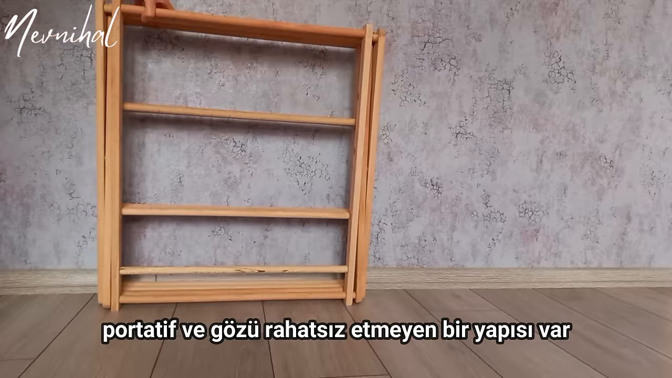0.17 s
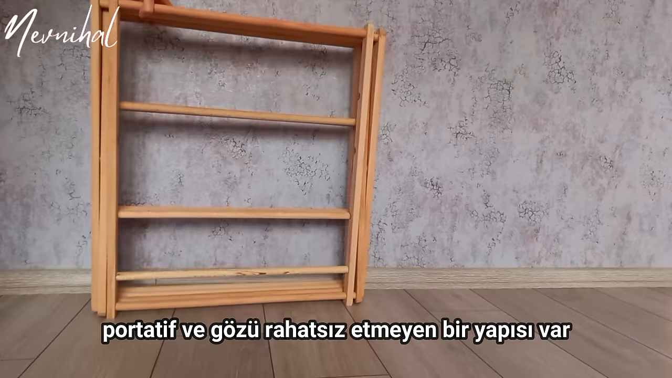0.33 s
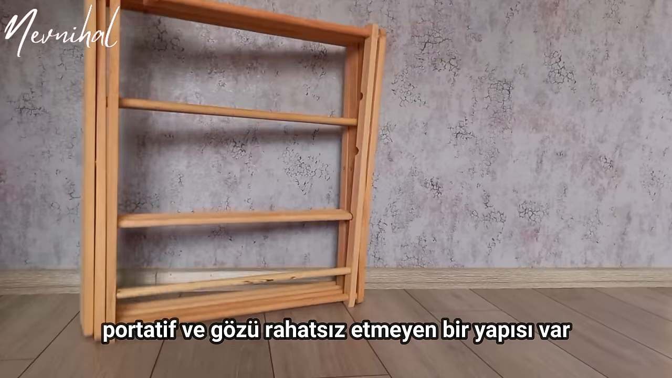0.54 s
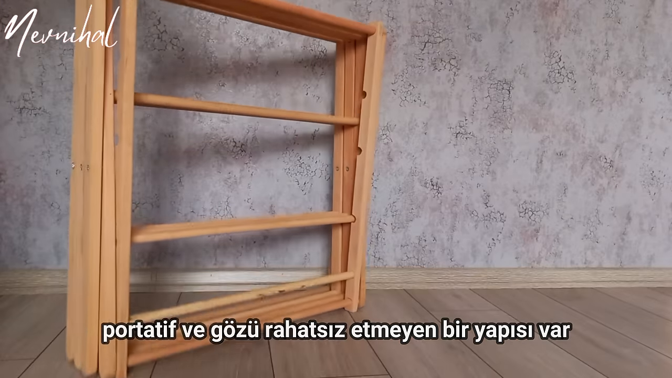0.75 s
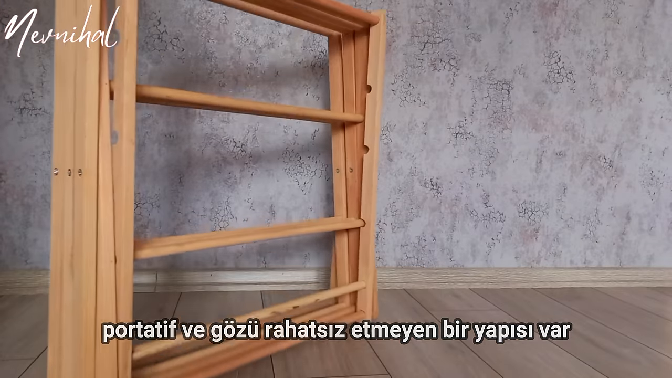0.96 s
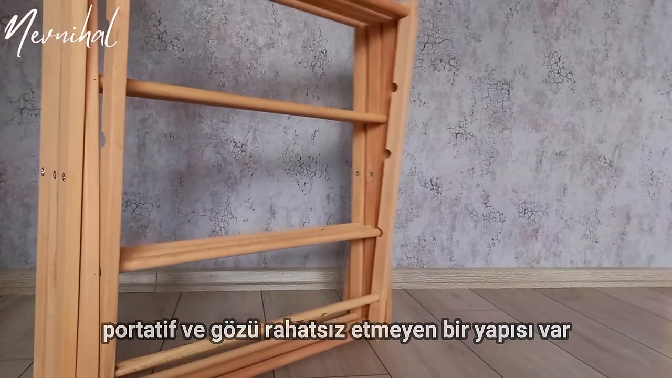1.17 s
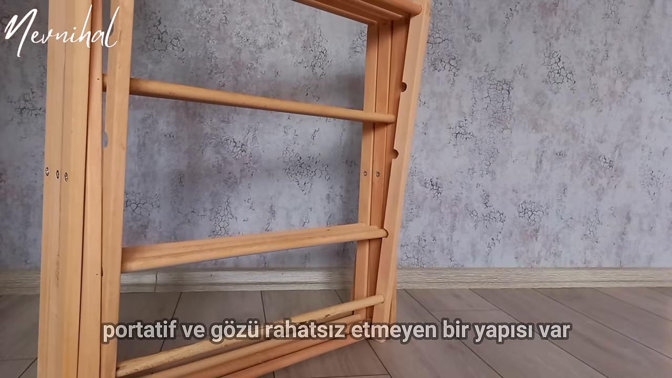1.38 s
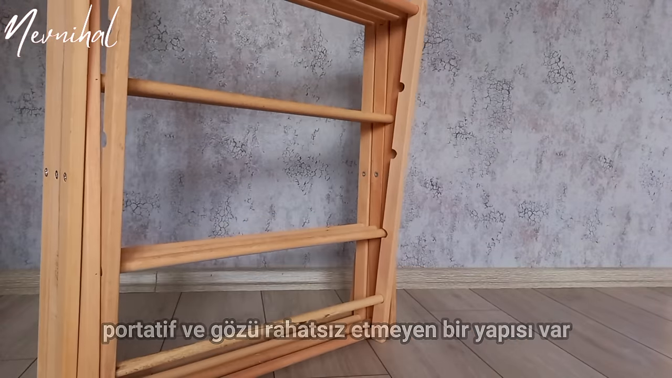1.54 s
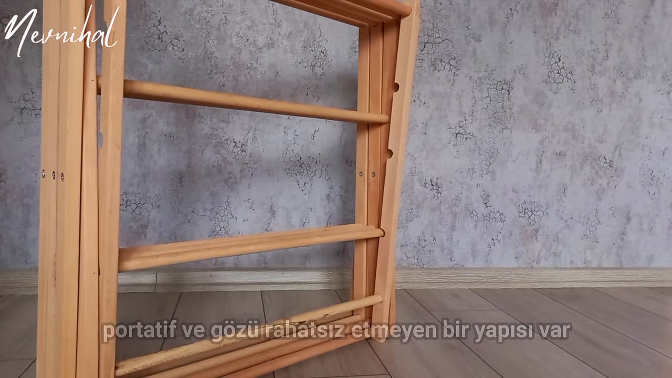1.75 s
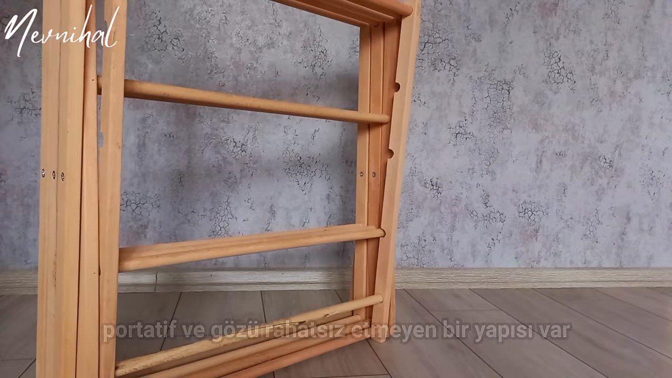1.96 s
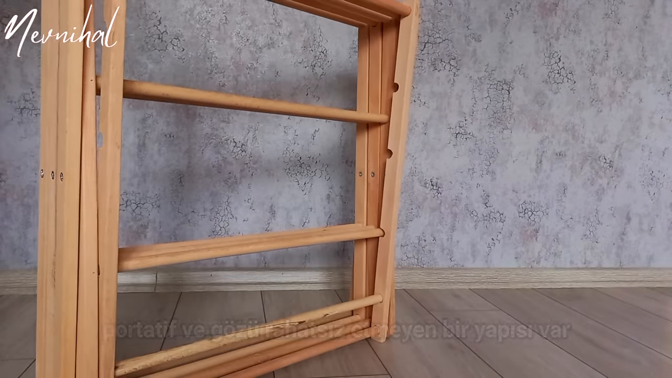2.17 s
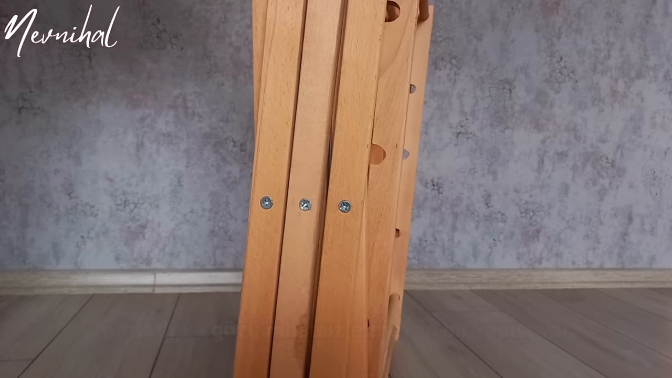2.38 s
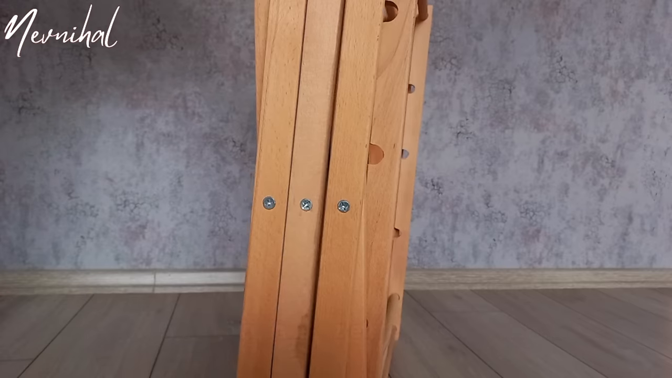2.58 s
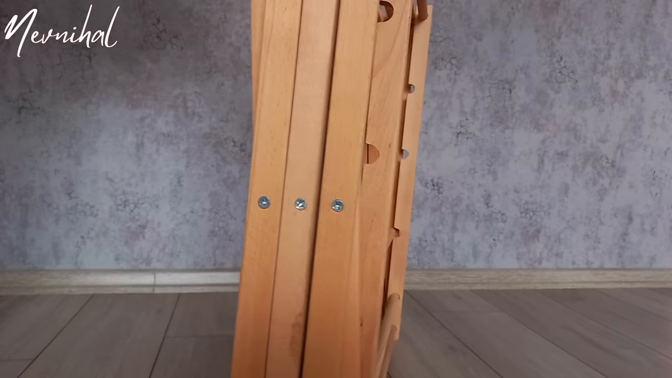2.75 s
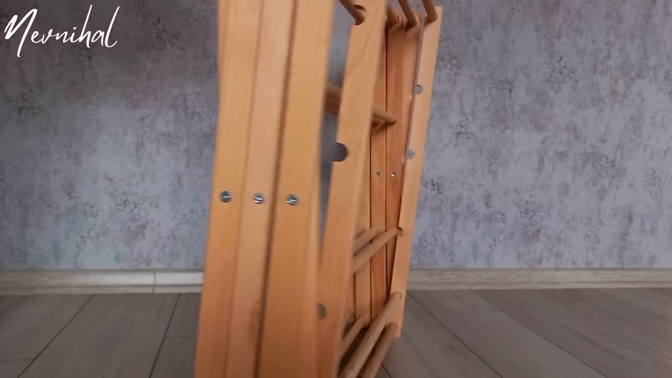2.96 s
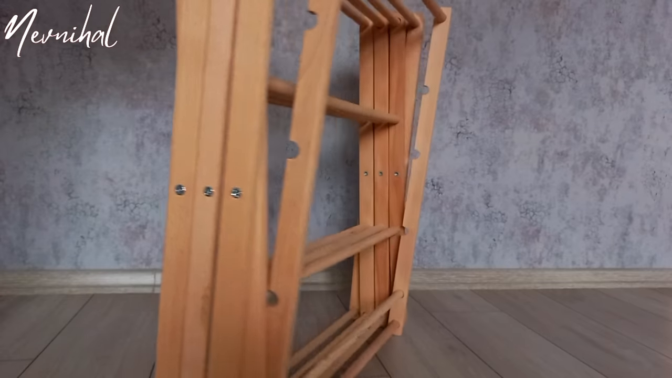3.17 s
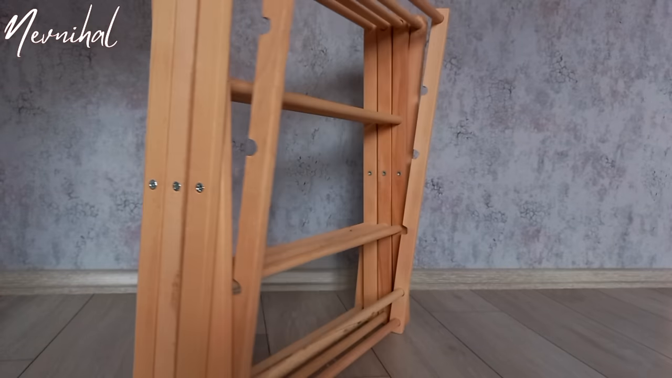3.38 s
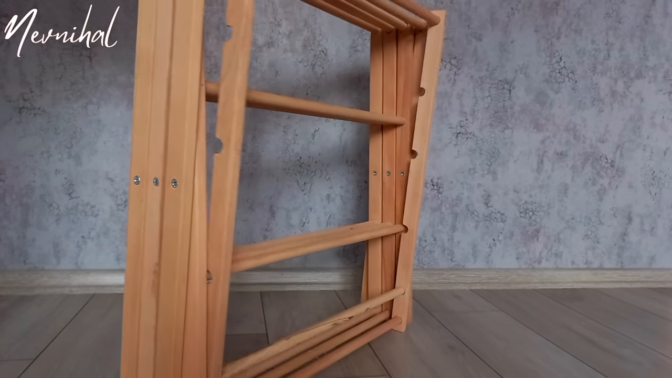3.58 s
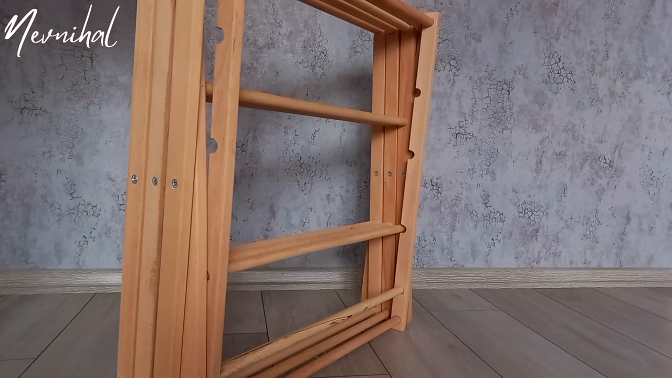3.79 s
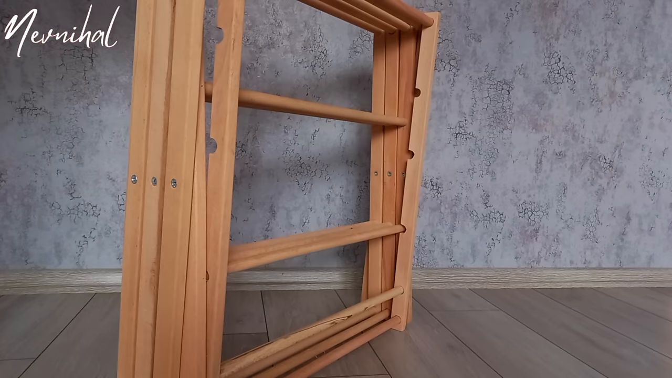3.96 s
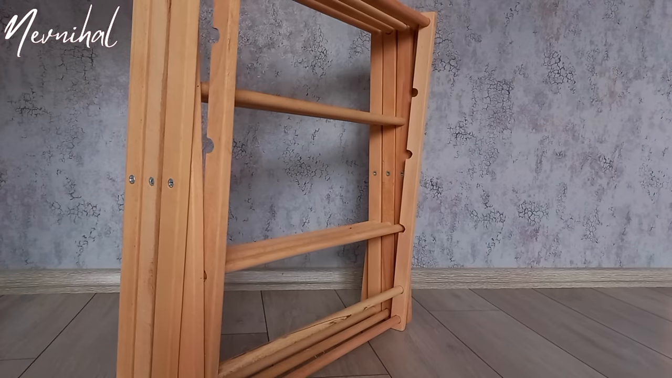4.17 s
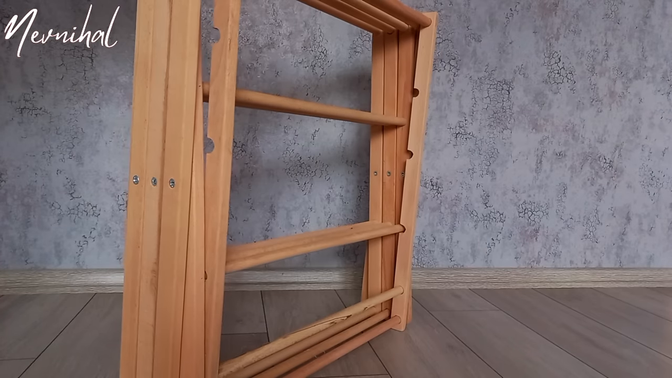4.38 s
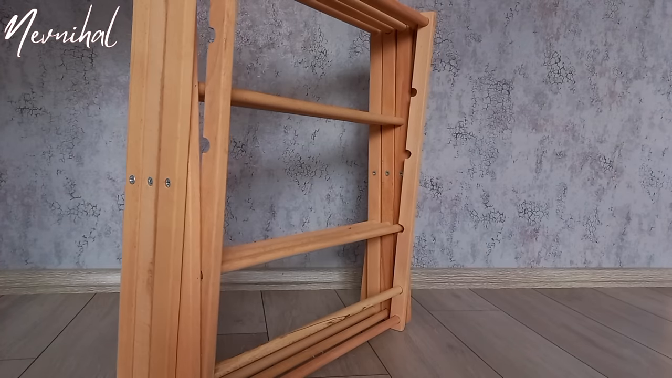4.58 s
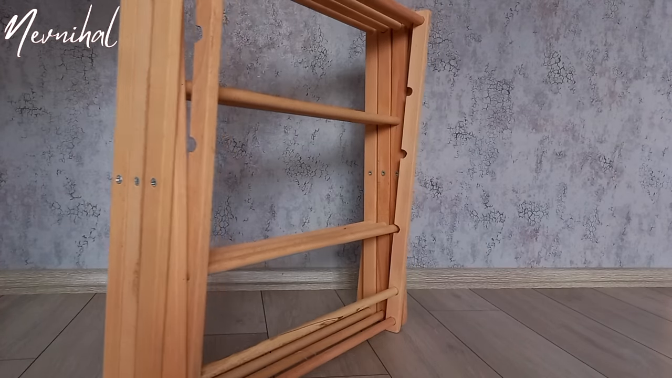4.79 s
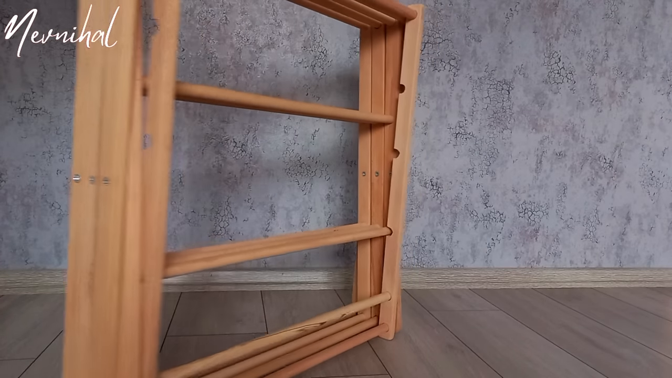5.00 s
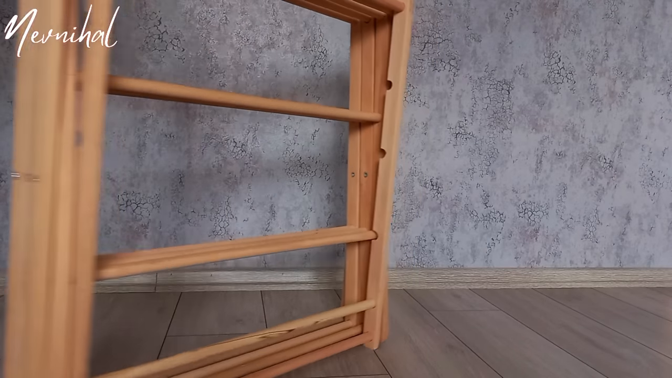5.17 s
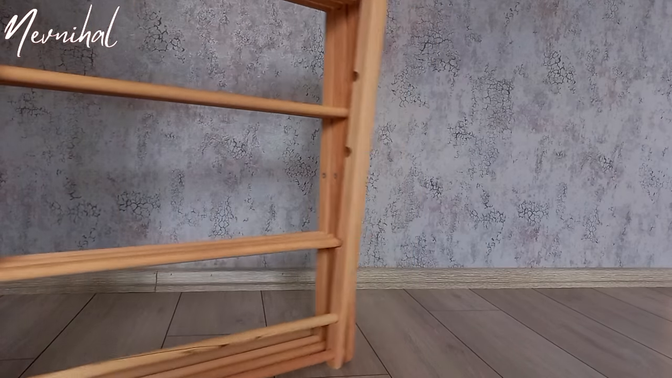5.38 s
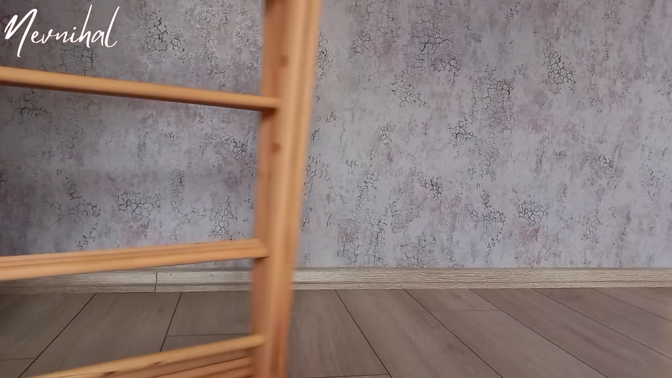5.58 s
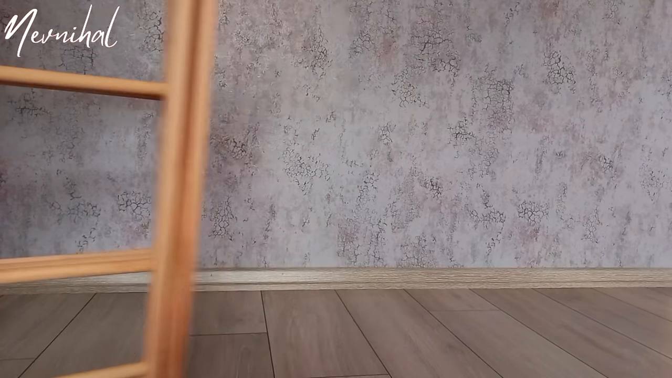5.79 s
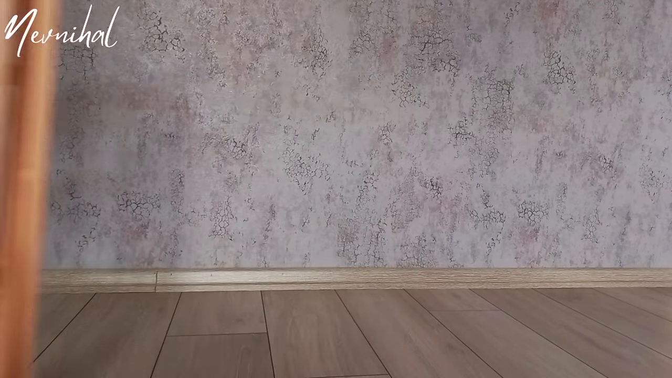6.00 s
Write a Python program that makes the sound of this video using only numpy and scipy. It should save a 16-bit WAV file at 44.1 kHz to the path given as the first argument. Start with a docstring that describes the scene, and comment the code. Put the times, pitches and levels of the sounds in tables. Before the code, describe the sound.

In a bare, quiet room a folded wooden drying rack is handled close to stereo microphones. Clacks and a gritty scrape come first, then a tight cluster of knocks. After a quiet gap with faint hand swishes, a second shorter scrape ends in a very sharp crack. Small knocks follow, then squeaky chirps and the loudest drag, with heavy thumps, continuing to the end.

```python
"""A bare room with a laminate floor: a folded wooden drying rack is turned and dragged before two microphones.
Its feet scrape in three strokes; tiny slips boom in the boards, ring the frame and hiss in the grit.
The last stroke comes close and is the loudest; lightly loaded feet chirp in narrow resonances.
Feet set down and loose frames clack as filtered pushes and cracks with frame modes, room echo and floor thump.
Hands swish over the slats as swelling noise, above the low rumble and faint hiss of the quiet room."""
import sys
import numpy as np
from scipy import signal
from scipy.fft import rfft, irfft, next_fast_len
from scipy.io import wavfile

SR = 44100
rng = np.random.default_rng(int(sys.argv[2]) if len(sys.argv) > 2 else 0)


def log_audio(samples):
    """Write samples as a 16-bit WAV file to the path given in sys.argv[1]."""
    # one column per channel
    frames = np.atleast_2d(samples).T
    # limit to full scale, then quantise
    limited = np.clip(frames, -1, 1)
    pcm = np.round(limited * 32767).astype(np.int16)
    wavfile.write(sys.argv[1], SR, pcm)


N = 266187  # length in samples

# push behind each stroke: time_s, speed_db (grit hiss), load_db (wood rasp, before a fixed lift)
STROKE_PUSH_1 = [(0.27, -59.5, -56), (0.358, -46, -43), (0.514, -39.5, -32), (0.552, -38, -34),
                 (0.954, -36, -30), (1.132, -42.5, -36), (1.14, -36.5, -32.5)]
STROKE_PUSH_2 = [(2.84, -65.5, -60), (2.89, -56, -53.5), (2.962, -47.5, -40), (3.09, -40.5, -29),
                 (3.166, -41.5, -30.5), (3.63, -43.5, -35), (3.72, -49.5, -48.5)]
STROKE_PUSH_3 = [(4.79, -60, -71.5), (4.896, -42.5, -48), (5.396, -35, -30.5), (5.414, -32, -28),
                 (6.03, -29.5, -24)]
# how hollow the floor is under each stroke: boom_db (over the load, at the usual load)
FLOOR_HOLLOWNESS_DB = [4.5, -2, 3]
# shape of the wood rasp in each stroke: frequency_hz, relative_db_per_hz
WOOD_RASP_1 = [(110, -35.5), (190, -20), (259, -12), (296, -1.5), (381, -11.5), (536, -2), (730, -8.5),
               (809, -3.5), (917, -11), (1020, -7.5), (1410, -14), (2390, -19), (2900, -21), (3770, -40),
               (6380, -120)]
WOOD_RASP_2 = [(110, -17.5), (185, -3), (274, -4), (317, -10.5), (574, -7.5), (809, -10), (917, -13.5),
               (1020, -11.5), (1140, -17), (1950, -25), (2110, -16.5), (2360, -32), (2900, -42.5),
               (3770, -47.5), (6380, -120)]
WOOD_RASP_3 = [(110, -44.5), (190, -13), (220, -6), (259, -2), (296, -3.5), (422, -12.5), (549, -2),
               (622, -6.5), (799, -5), (906, -11), (1100, -10.5), (1410, -14), (2900, -15.5), (3770, -50),
               (6380, -120)]
# shape of the grit hiss in each stroke: frequency_hz, relative_db_per_hz
GRIT_HISS_1 = [(1290, -41), (2200, -21), (2470, -27), (2680, 1.5), (4600, 4.5), (5030, 0.5), (5980, -4.5),
               (7400, -10), (8580, -7), (9620, -16), (11900, -17.5), (15600, -22)]
GRIT_HISS_2 = [(1290, -40.5), (2200, -13), (2370, -8.5), (2630, -3.5), (2840, -1.5), (3100, -3.5),
               (4340, -4), (7220, -14.5), (8440, -11.5), (9620, -20.5), (13900, -27), (15600, -37)]
GRIT_HISS_3 = [(1290, -12.5), (2200, -19), (2450, -6), (2770, -0.5), (3370, -0.5), (4710, 0.5), (5830, -8),
               (8580, -9), (10500, -19), (12800, -17), (15600, -23.5)]
# shape of the floor boards' boom: frequency_hz, relative_db_per_hz
BOARD_BOOM = [(40, -27), (48, -12), (59, -10.5), (70, 0), (81, 13), (94, 2.5), (112, 10.5), (134, -8.5),
              (155, 1.5), (185, -7), (220, -9)]
# modes of the wooden frame: pitch_hz, relative_db
FRAME_MODES = [(217, -3.5), (293, -10), (360, -1.5), (559, -2.5), (788, 3), (1005, 0), (1320, 1.5),
               (1416, -5.5), (1510, -5), (1835, -6.5), (1895, -4.5), (2003, -8), (2080, 1), (2325, -9.5),
               (2603, 2), (2800, -3.5), (2939, 0.5), (3208, -4), (3712, 6.5), (4027, -0.5), (4330, -16.5),
               (5545, -8)]
# undamped decay of the frame, higher modes die sooner: frequency_hz, t60_s
FRAME_DECAY = [(200, .42), (700, .3), (2000, .28), (5500, .2)]
# a lightly loaded foot chirps as it starts to slide: start_s, length_s, pitch_hz, width_hz, level_db
FOOT_CHIRPS = [(4.835, 0.235, 2886, 70.4, -45), (4.892, .14, 2250, 25, -51.5),
               (4.992, 0.14, 1930, 25, -46.5), (5.147, 0.27, 2855, 71, -40.5)]
# wood on wood and feet on the floor: start_s, peak_db, hardness_hz, thump_db, direct_db (push and crack)
BLOWS = [(0.003, -55, 300, -36, -1), (0.0745, -37, 1170, -31, 10), (0.081, -19.5, 2770, -55, -47),
         (0.101, -17.5, 1100, -27, -3), (0.185, -23, 666, -33.5, 2), (0.45, -24, 400, -17.5, 1),
         (0.859, -21, 14000, -19.5, 5), (1.156, -13.5, 1000, -14, 18), (1.175, -9, 1100, -19.5, 9.5),
         (1.187, -12, 550, -16.5, 6.5), (1.212, -9.5, 4530, -21.5, 8.5), (1.696, -40, 750, -30.5, -8),
         (1.82, -48.5, 400, -53.5, -10), (2.247, -44.5, 750, -33, -5), (2.293, -41.5, 400, -45, -10),
         (2.363, -49, 3800, -63, -0.5), (2.45, -73.5, 300, -39, 5), (2.642, -37.5, 900, -34.5, -16),
         (2.657, -31.5, 1650, -54, -10), (2.681, -21, 1550, -37, 8), (2.708, -35.5, 11300, -60, -6),
         (3.02, -18.5, 220, -29.5, -1), (3.092, -16, 220, -25, -8.5), (3.296, -19.5, 1250, -36.5, 1),
         (3.746, -11.5, 3000, -29.5, 4), (3.751, -2.5, 5570, -23, 5), (3.776, -6, 3370, -12.5, -12),
         (3.97, -28.5, 890, -34, -7), (4.126, -41.5, 601, -30.5, 0), (4.146, -27, 1700, -34, -14.5),
         (4.21, -28.5, 550, -48.5, -32.5), (4.294, -28.5, 1090, -34.5, 1), (4.41, -28.5, 2050, -35.5, 0.5),
         (5.44, -11.5, 1300, -14, -10), (5.52, -21, 300, -9.5, -4), (5.712, -5, 500, -9.5, 5.5)]
# shapes of the blows and of their floor thumps: frequency_hz, relative_db_per_hz
CLACK_SPECTRUM = [(100, -18), (300, 0.5), (800, -4.5), (1500, -3.5), (2700, -0.5), (3400, -5.5), (5000, -7),
                  (6500, -11.5), (8500, -8.5), (10500, -13.5), (16000, -19.5)]
THUMP_SPECTRUM = [(35, -29), (60, -9.5), (80, 3.5), (130, 2), (220, -3), (350, -17.5), (700, -35.5),
                  (2000, -61)]
# decay of the room echo: frequency_hz, t60_s
ROOM_DECAY = [(60, 0.67), (150, 0.33), (400, 0.39), (1000, 0.38), (2500, 0.34), (5000, .32), (9000, 0.29),
              (16000, .24)]
# hand and sleeve slide over the slats to a new grip: middle_s, level_db, spread_s, pitch_hz
GRIP_RUBS = [(1.72, -57, 0.067, 3020), (1.98, -65, 0.12, 8200), (2.19, -70, .025, 8750),
             (2.547, -58.5, 0.026, 3330), (2.62, -67, 0.039, 8000), (4.17, -65, 0.042, 7200),
             (4.406, -57.5, 0.026, 4400), (4.72, -57, 0.064, 3180)]
# shape of their airy hiss: frequency_hz, relative_db_per_hz
RUB_SPECTRUM = [(2000, -11), (2800, -6), (4600, 2.5), (7000, -1.5), (8600, 0), (10000, -7), (15000, -17)]
# shape of the quiet room: frequency_hz, relative_db_per_hz
QUIET_ROOM = [(25, -26), (48, -8.5), (75, -4), (125, -7), (200, -15), (500, -19.5), (1500, -23.5),
              (3000, -25), (6000, -31), (8500, -24.5), (10000, -31), (16000, -30.5)]
# how alike the two microphones hear: frequency_hz, likeness (1 same, 0 unrelated)
MICROPHONE_LIKENESS = [(60, .997), (170, .975), (350, .9), (700, .65), (1400, -.1), (2800, .03), (16000, 0)]
# the scraping feet lie to the left: frequency_hz, left_over_right_db
LEFT_LEAN = [(100, 0), (700, 0.8), (1400, -1), (2800, 1), (5500, 3), (10000, 4), (16000, 1)]

LEFT_LEAD_S = .00016
CHIRP_ATTACK_S, CHIRP_RELEASE_S = 0.032, 0.026
CUTOFF_HZ = 15900


def dragging(judder_db=0.73, boom_judder_db=2.0, grit_judder_db=0.03, rasp_db=2.34,
             boom_follows=1.05, usual_load_db=-30):
    """Slips excite boards, frame and grit: speed sets the hiss, load the rasp and boom; the grip wavers."""
    grip = drift(16)
    boards = colour(slips(2900, spread_db=0.0), BOARD_BOOM)
    boards = rms_one(boards * from_db(boom_judder_db * grip))

    wood = dense_modes(slips(5000, spread_db=3.0), share=0.69, decay_s=.012)
    wood = through_frame(wood, ring=0.54, damping=1.0) * from_db(judder_db * grip)

    dust = dense_modes(slips(11000, spread_db=3.0), share=.55, decay_s=.008)
    dust = through_frame(dust, ring=0.21, damping=1.0)
    dust = dust * from_db(grit_judder_db * (drift(30) + .5 * grip))

    strokes = [(STROKE_PUSH_1, WOOD_RASP_1, GRIT_HISS_1),
               (STROKE_PUSH_2, WOOD_RASP_2, GRIT_HISS_2),
               (STROKE_PUSH_3, WOOD_RASP_3, GRIT_HISS_3)]
    out = 0
    for (push, rasp_colour, grit_colour), hollow_db in zip(strokes, FLOOR_HOLLOWNESS_DB):
        speed, load = gains(push)
        boom = from_db(usual_load_db + hollow_db) * (load / from_db(usual_load_db)) ** boom_follows
        rasp = from_db(rasp_db) * load * colour(wood, rasp_colour)
        hiss = speed * colour(dust, grit_colour)
        out = out + boom * boards + rasp + hiss
    return lean_left(out)


def slips(per_s, spread_db):
    """Tiny random catches of wood on the floor, either way; spread_db makes their sizes uneven."""
    excess_db = spread_db * np.minimum(rng.exponential(1, (2, N)), 5)
    sizes = from_db(excess_db) * rng.choice([-1, 1], (2, N))
    return sizes * (rng.random((2, N)) < per_s / SR)


def dense_modes(x, share, decay_s):
    """Countless weak modes ripple the spectrum; the ripple shifts as the feet travel."""
    t = np.arange(SR // 10) / SR
    responses = rng.standard_normal((3, 2, len(t))) * np.exp(-t / decay_s)
    responses /= np.linalg.norm(responses, axis=2, keepdims=True)
    # drifting weights blend the three responses
    places = np.array([drift(2.7) for _ in responses])
    places /= np.linalg.norm(places, axis=0)
    ripple = sum(place * signal.oaconvolve(x, response, axes=1)[:, :N]
                 for place, response in zip(places, responses))
    return x + share * ripple


def through_frame(x, ring, damping):
    """The frame adds its modes to what shakes it; damping by hand and floor widens them."""
    modes = 0
    for hz, db in FRAME_MODES:
        width_hz = damping * np.log(1000) / (np.pi * at_hz(FRAME_DECAY, hz))
        modes = modes + from_db(db) * resonate(x, hz, width_hz)
    return x + ring * modes


def chirping(waver_db=0.5, waver_hz=18):
    """Friction sings in narrow resonances of the foot; each chirp swells, wavers and dies."""
    t, out = np.arange(N) / SR, 0
    for start, length, hz, width, db in FOOT_CHIRPS:
        once = resonate(rng.standard_normal((2, N)), hz, width)
        song = rms_one(resonate(once, hz, width))
        swell = np.clip((t - start) / CHIRP_ATTACK_S, 0, 1)
        release = np.exp(-np.maximum(t - start - length, 0) / CHIRP_RELEASE_S)
        out = out + from_db(db + waver_db * drift(waver_hz)) * swell * release * song
    return out


def knocks(crack_s=0.006, push_hz=4500, room_db=-3.0, modes_db=-16.0, thin=0.11,
           thump_s=0.014, thump_room_db=6.0):
    """Each blow is a push, a short crack, the ring of the frame and the room; the floor thumps below."""
    t, out = np.arange(SR) / SR, np.zeros((2, N + SR))
    ringing = np.array([from_db(db - 60 * t / at_hz(FRAME_DECAY, hz)) * np.exp(2j * np.pi * hz * t)
                        for hz, db in FRAME_MODES])
    # three pairs of echoes serve the blows in turn
    echoes = [(room_tail(CLACK_SPECTRUM), room_tail(THUMP_SPECTRUM)) for _ in range(3)]
    cracks = colour(rng.standard_normal((2, N + SR)), CLACK_SPECTRUM)
    thuds = colour(rng.standard_normal((2, N + SR)), THUMP_SPECTRUM)
    for k, (s, peak_db, hardness_hz, thump_db, direct_db) in enumerate(BLOWS):
        echo, low_echo = echoes[k % len(echoes)]
        first = k * (N // len(BLOWS))
        own = slice(first, first + SR)  # each blow starts elsewhere in the noise

        # every contact point excites the modes in its own way
        size = (2, len(FRAME_MODES))
        strengths = from_db(rng.normal(0, 2, size)) * np.exp(2j * np.pi * rng.random(size))
        modes = (strengths @ ringing).real

        direct = cracks[:, own] * np.exp(-t / crack_s) * (1 - np.exp(-t / 0.0006))
        # a soft contact pushes harder here; the low-pass below stretches the push
        direct[:, 0] += (push_hz / max(hardness_hz, 1000)) ** 2
        clack = from_db(direct_db) * direct + from_db(room_db) * echo + from_db(modes_db) * modes

        # soft contacts are dull; hard ones are bright and thin
        dull = signal.butter(3, hardness_hz, fs=SR, output="sos")
        thinning = signal.butter(1, thin * hardness_hz, "high", fs=SR, output="sos")
        clack = signal.sosfilt(thinning, signal.sosfilt(dull, clack))

        thump = thuds[:, own] * np.exp(-t / thump_s) + from_db(thump_room_db) * low_echo
        thump = thump * (1 - np.exp(-t / 0.011))
        at = round(s * SR)
        out[:, at:at + SR] += from_db(peak_db) * peak_one(clack, crest=4.69)
        out[:, at:at + SR] += from_db(thump_db) * peak_one(thump, crest=4.46)
    return out[:, :N]


def room_tail(spectrum, ring=0.48):
    """One second of diffuse echo, coloured by the frame; each band dies at its own rate."""
    t, hz = np.arange(SR) / SR, np.arange(SR // 2 + 1)
    # the first second lets the modes build up
    shaken = through_frame(rng.standard_normal((2, 2 * SR)), ring, damping=2.3)[:, SR:]
    noise, out = rfft(colour(shaken, spectrum)), 0
    for k, (_, t60) in enumerate(ROOM_DECAY):
        # bands overlap, and their shares add up to one
        share = at_hz([(f, j == k) for j, (f, _) in enumerate(ROOM_DECAY)], hz)
        out = out + irfft(noise * share, SR) * from_db(-60 * t / t60)
    return out


def peak_one(blow, crest):
    """Scale a blow to a peak near 1, going by the power of its first 50 ms."""
    return blow / (crest * np.sqrt(np.mean(blow[:, :SR // 20] ** 2)))


def rubbing(width_hz=1300):
    """Short dry swishes over smooth wood: resonant friction and airy hiss, swelling and fading."""
    t, friction = np.arange(N) / SR, rng.standard_normal((2, N))
    airy = colour(rng.standard_normal((2, N)), RUB_SPECTRUM)
    out = 0
    for middle, db, spread, hz in GRIP_RUBS:
        pitched = rms_one(resonate(resonate(friction, hz, width_hz), hz, width_hz))
        swell = np.exp(-.5 * ((t - middle) / spread) ** 2)
        out = out + from_db(db) * swell * rms_one(pitched + airy)
    return lean_left(out)


def room_tone(level_db=-64.5):
    """Low rumble and faint hiss of the quiet room, as steady coloured noise."""
    return from_db(level_db) * colour(rng.standard_normal((2, N)), QUIET_ROOM)


def lean_left(x):
    """The sound reaches the left side earlier, and its treble is mostly stronger there."""
    size = next_fast_len(N)
    hz = np.arange(size // 2 + 1) * SR / size
    side = np.array([[.5], [-.5]])
    level = from_db(at_hz(LEFT_LEAN, hz) * side)
    lead = np.exp(2j * np.pi * hz * LEFT_LEAD_S * side)
    return irfft(rfft(x, size) * level * lead, size)[:, :N]


def colour(pair, spectrum, edge_order=8):
    """Two unrelated signals become a stereo pair with this spectrum, alike mainly in the bass."""
    size = next_fast_len(pair.shape[1])
    hz = np.arange(size // 2 + 1) * SR / size + 1e-3  # the offset avoids dividing by zero
    mid, side = rfft(pair, size)
    alike = np.clip(at_hz(MICROPHONE_LIKENESS, hz), -1, 1)
    both = np.sqrt(1 + alike) * mid + np.sqrt(1 - alike) * side * [[1], [-1]]
    # steep fall beyond both ends of the table
    skirts = np.minimum(1, np.minimum(hz / spectrum[0][0], spectrum[-1][0] / hz)) ** edge_order
    shaped = both * skirts * from_db(at_hz(spectrum, hz))
    return rms_one(irfft(shaped, size)[:, :pair.shape[1]])


def resonate(x, hz, width_hz):
    """One resonance, gain about 1 at its top."""
    r = np.exp(-np.pi * width_hz / SR)
    zeros = [(1 - r * r) / 2, 0, (r * r - 1) / 2]
    poles = [1, -2 * r * np.cos(2 * np.pi * hz / SR), r * r]
    return signal.lfilter(zeros, poles, x)


def drift(rate_hz):
    """Smooth chance with rms 1: noise through two equal low-pass poles, settled for a second."""
    r = np.exp(-2 * np.pi * rate_hz / SR)
    smooth = signal.lfilter([1], [1, -2 * r, r * r], rng.standard_normal(N + SR))
    return rms_one(smooth[SR:])


def gains(rows, attack_s=0.044, release_s=.065):
    """Gain curves from rows of dB, fading in before them and out after them."""
    s, *columns = np.transpose(rows)
    t = np.arange(N) / SR
    fade = np.exp(-np.maximum(s[0] - t, 0) / attack_s - np.maximum(t - s[-1], 0) / release_s)
    return [from_db(np.interp(t, s, c)) * fade for c in columns]


def at_hz(points, hz):
    """Read a table on a log-frequency axis."""
    f, value = np.transpose(points)
    return np.interp(np.log(np.maximum(hz, 1)), np.log(f), value)


def rms_one(x):
    """Scale so that the middle of the stereo pair has rms 1."""
    return x / np.sqrt(np.mean(np.atleast_2d(x).mean(axis=0) ** 2) + 1e-20)


def from_db(db):
    """Decibels to gain."""
    return 10 ** (np.asarray(db) / 20)


def scene():
    """The rack in the room."""
    return dragging() + chirping() + knocks() + rubbing() + room_tone()


def record(dry):
    """Peaks are clipped just below full scale, then the top is cut steeply."""
    top_cut = signal.ellip(12, .1, 90, CUTOFF_HZ, fs=SR, output="sos")
    return signal.sosfilt(top_cut, np.clip(dry, -.97, .97))


dry = scene()
out = record(dry)
log_audio(out)
```